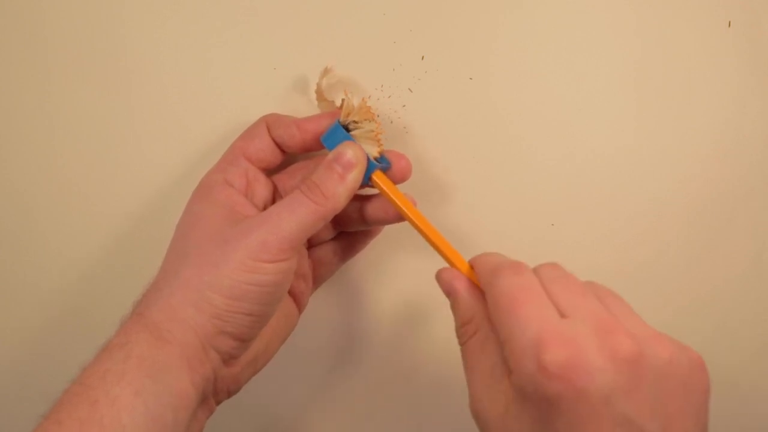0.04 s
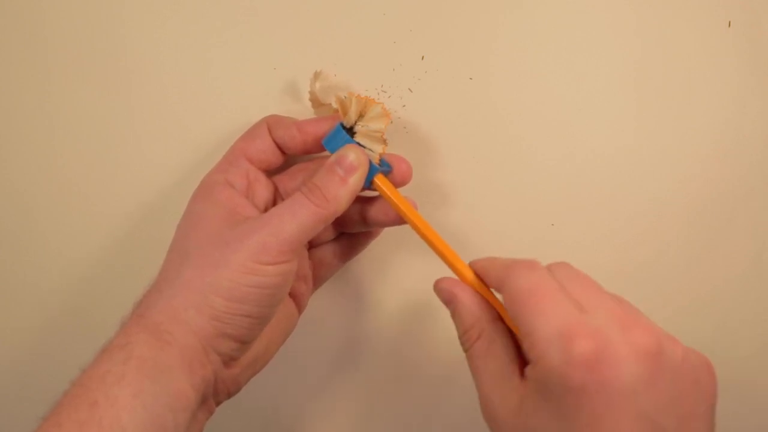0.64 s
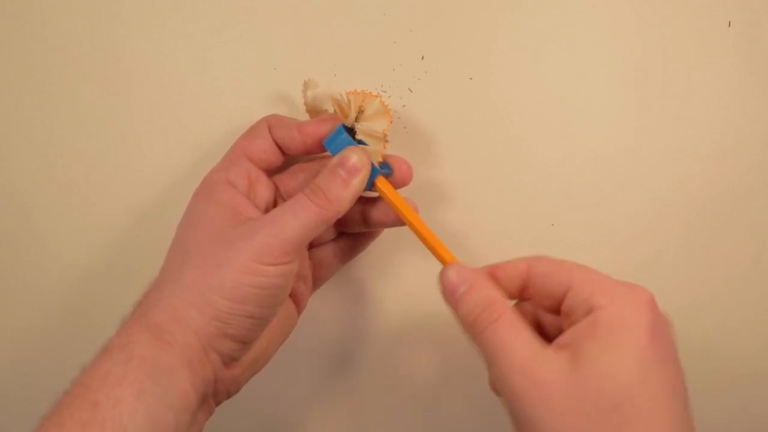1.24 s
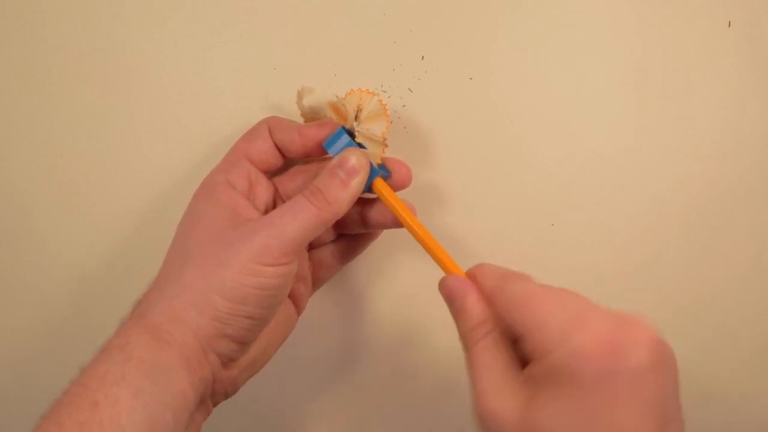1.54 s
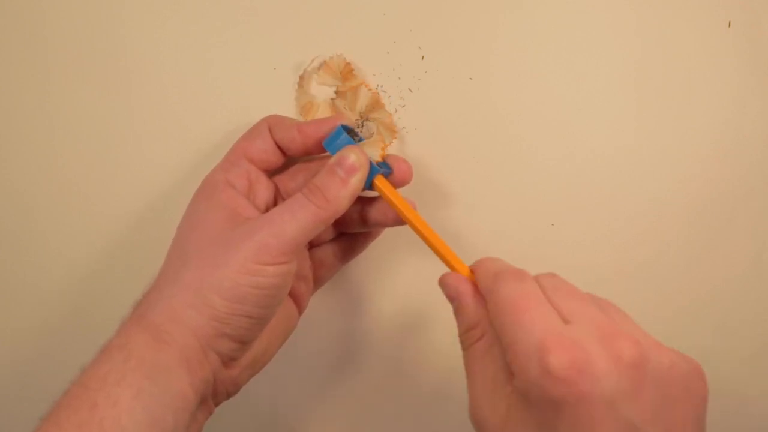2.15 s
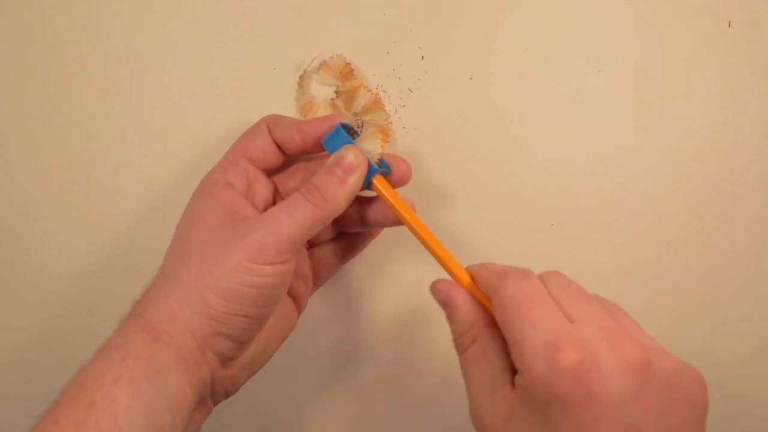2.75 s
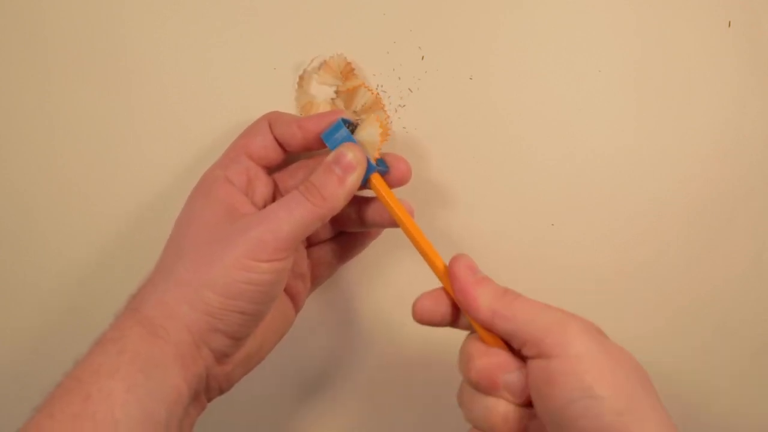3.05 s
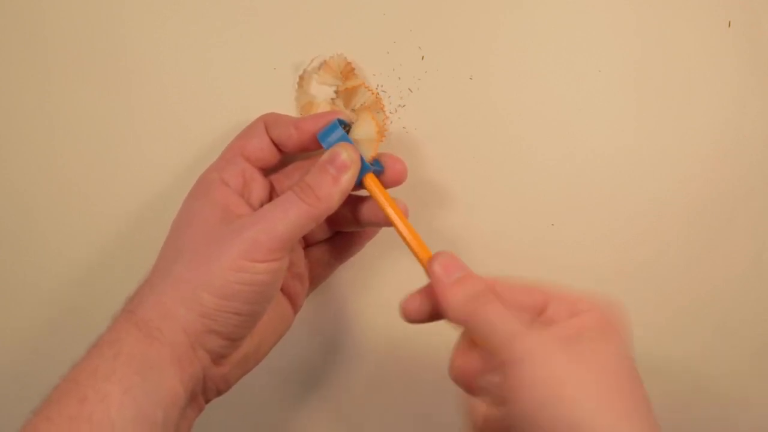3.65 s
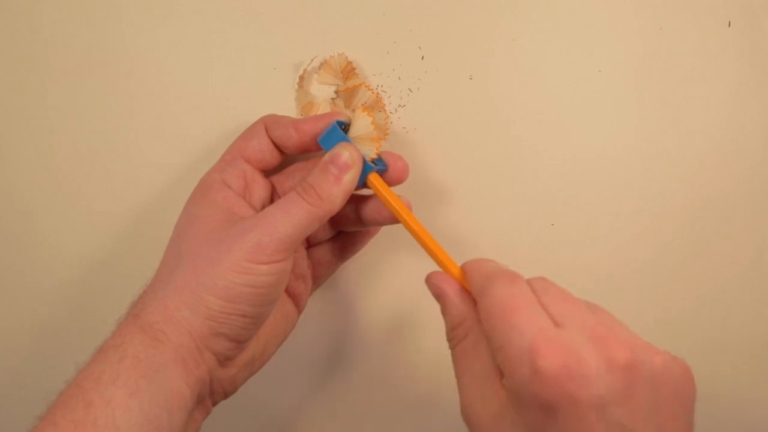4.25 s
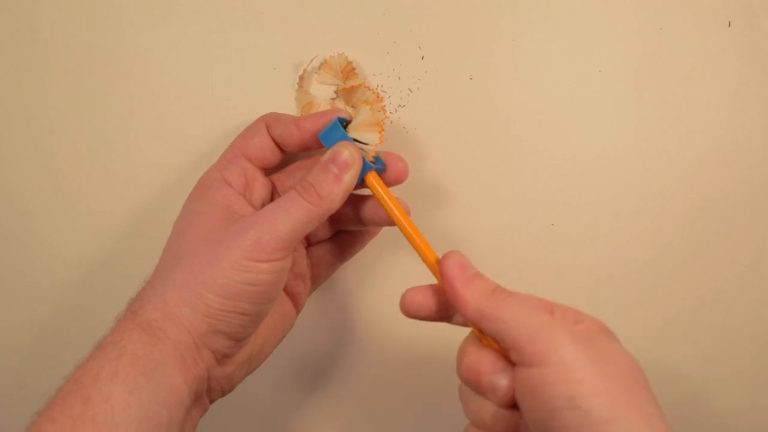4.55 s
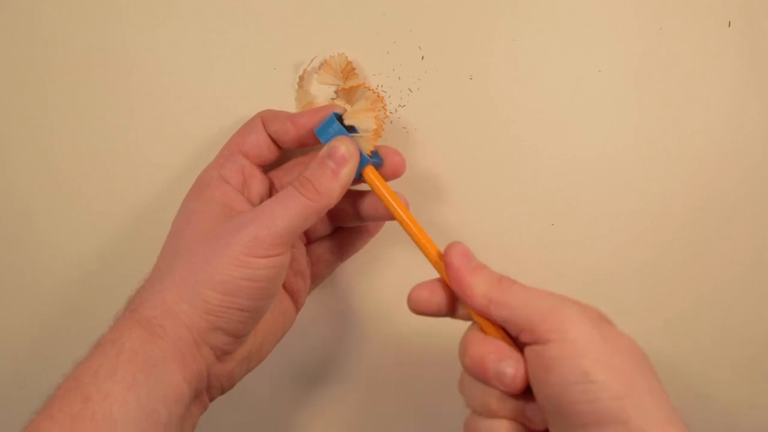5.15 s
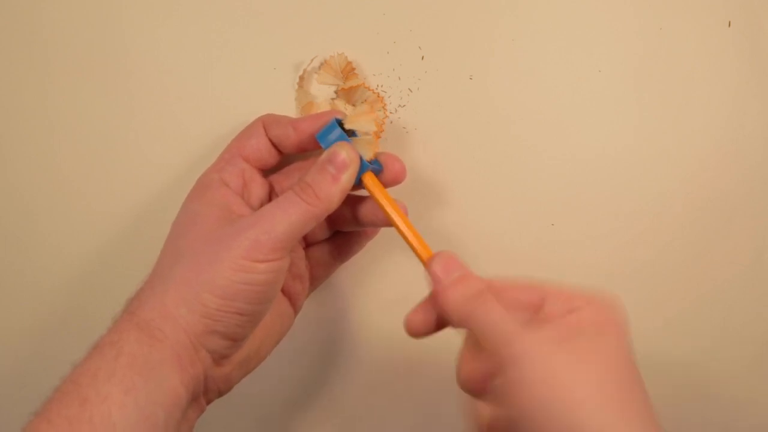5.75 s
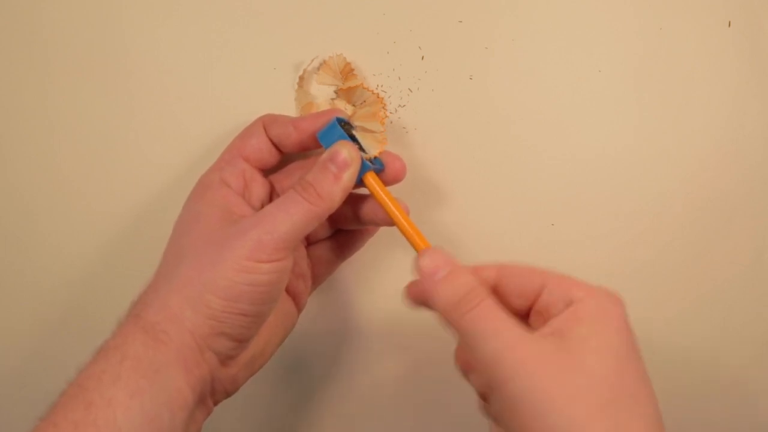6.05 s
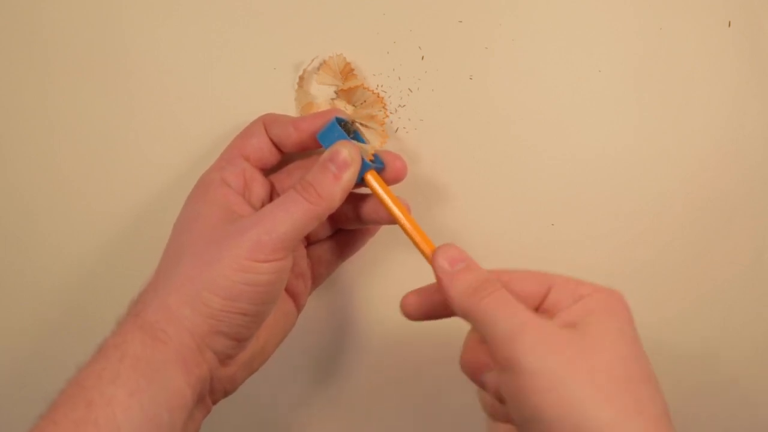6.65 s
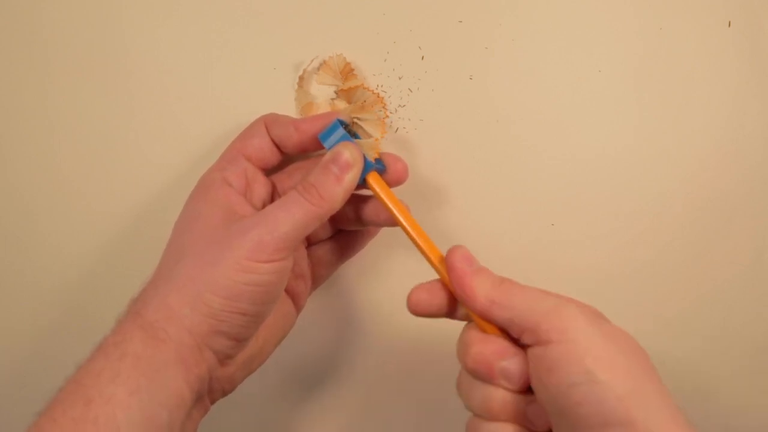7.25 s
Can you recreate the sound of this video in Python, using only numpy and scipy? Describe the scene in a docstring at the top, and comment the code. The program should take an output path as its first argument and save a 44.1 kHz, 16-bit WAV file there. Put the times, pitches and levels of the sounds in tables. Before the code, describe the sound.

A wooden pencil is turned in a small plastic sharpener, giving eleven short, grainy rasps, about one every two thirds of a second. Sharp snaps of cracking shavings mix with the strokes, each carrying a soft low rumble from the hands. Between twists, fingers rub faintly and the pencil ticks in its hole. The microphone is close, just above a table in a quiet room with a faint hum.

```python
"""Eleven short, grainy rasps with sharp snaps: a wooden pencil twisted in a small plastic sharpener.
The blade tears wood fibres, the curling shaving cracks, and the drag shakes sharpener and hands.
Between twists the fingers rub to a new grip and the pencil ticks loosely in its hole.
It all sits close to one microphone, just above a table, in a quiet room with faint air and hum."""
import sys
import numpy as np
from scipy import signal
from scipy.fft import rfft, irfft
from scipy.io import wavfile
from scipy.ndimage import uniform_filter1d

SR = 44100
rng = np.random.default_rng(int(sys.argv[2]) if len(sys.argv) > 2 else 0)


def dump(signal):
    """Clip the signal to [-1, 1] and save it as 16-bit WAV at the path in sys.argv[1]."""
    limited = np.clip(np.atleast_2d(signal).T, -1, 1)
    pcm = np.round(limited * 32767).astype(np.int16)
    wavfile.write(sys.argv[1], SR, pcm)


N = 331174
TIME = np.arange(N) / SR

# one row a twist: start/s, length/s, swell/dB, then levels before trim:
# rasp/dB, rumble/dB, body ring/dB, shell ring/dB (all at full pressure), regrip rub/dB
TWISTS = [ (0.255, 0.076, 5.4, -33.5, -59.5, -59.5, -57.5, -62.5),
          (0.945, .090, 5.6, -33, -56, -62.5, -55, -67.5),
          (1.659, 0.087, 3.8, -33, -57.5, -60.5, -58, -64.5),
          (2.344, 0.087, 3.6, -35.5, -56, -61, -58.5, -74.5),
          (3.018, 0.086, 2.3, -33.5, -53, -77, -55.5, -57.5),
          (3.697, 0.088, 10.7, -33.5, -55.5, -60, -56, -79), (4.419, 0.13, 10.6, -36, -58, -54, -59, -62),
          (5.12, 0.09, 13, -33, -52.5, -48.5, -52, -74), (5.805, 0.079, 13, -32.5, -54, -53.5, -55, -69.5),
          (6.459, 0.078, 9.4, -31, -52.5, -47.5, -54.5, -72),
          (7.192, 0.084, 5.5, -33, -53, -57, -52.5, -68)]


def blade(rasp_trim_db, snap_trim_db, judder_db):
    """Fibres tear by the thousand, clumping as the blade judders; the shaving cracks and splits."""
    # loud cracks of the shaving: t/s, relative level/dB, tilt/(dB per octave)
    snaps = [(0.275, -27.5, -2), (0.29, -30.5, -4), (0.317, -29.5, -2), (.9937, -34, -14),
             (1.005, -26, -11), (1.6642, -28, 0), (1.6856, -22, -3), (1.723, -19, -7), (1.7353, -19.5, 0.5),
             (2.3524, -16, -3), (2.3889, -9.5, -0.5), (3.023, -19.5, 0), (3.0639, -17.5, 8),
             (3.0815, -20, 15), (3.7452, -23.5, -3), (3.7539, -23.5, 4), (3.7752, -26, 2),
             (4.4436, -28.5, -1), (5.1494, -28, -5), (5.2315, -35, -1.5), (5.8581, -5.5, 1.5),
             (6.504, -12.5, -1.5), (6.531, -18, 0.5), (7.2044, -16.5, 1.5), (7.2254, -18.5, -1),
             (7.2452, -20, 3), (7.2528, -18.5, 4), (7.2695, -16.5, 2)]
    # the loose shaving crinkles as it settles: t/s, relative level/dB
    crinkles = [(0.438, -44), (1.83, -38.5), (1.892, -47), (2.511, -49), (2.532, -53), (2.564, -48),
                (2.586, -40), (3.236, -40)]
    # strips of wood split off with a pitched rip: t/s, half-length/s, level/dB, f/Hz
    splits = [(0.26, 0.0021, -44, 3470), (.987, 0.0016, -37, 8600), (1.006, .003, -35, 4800),
              (1.019, 0.0038, -39.5, 4580), (1.724, 0.00072, -40, 3870), (3.078, 0.0024, -35, 4500),
              (3.773, .0027, -39.5, 4240), (4.524, 0.014, -47.5, 3880), (5.19, 0.0045, -44, 4520)]
    # tone of tearing wood: f/Hz, relative level/dB
    rasp_eq = [(150, -16.5), (450, -13), (800, -9), (1200, -11.5), (1750, -6), (2450, -14.5), (3400, -0.5),
               (4900, -4), (6100, -7), (7500, 2), (10300, -2.5), (12700, 4), (14000, -13), (16000, -0.5)]
    # tone of a cracking shaving: f/Hz, relative level/dB
    crack_eq = [(300, -31.5), (1100, -41), (1800, -30), (2600, -8.5), (3700, -7.5), (5300, -8.5),
                (6200, -6), (7300, 0), (9200, 1), (10600, 0.5), (12800, 0.5), (15200, -6), (17000, -11.5)]
    # resonances of blade and plastic shell: f/Hz, width/Hz, lift/dB
    shell_modes = [(2190, 67, 13), (3966, 150, 9.5), (4590, 100, 10), (5150, 220, 6.5), (7500, 95, -8),
                   (7660, 200, -1.5), (8130, 340, 5), (9040, 160, 2), (9480, 290, 3), (11170, 200, -2),
                   (12100, 220, -9)]
    _, _, _, bites_db, *_ = np.transpose(TWISTS)
    # the blade sticks 5 ms before each snap, ducking the rasp by a third
    sticking = np.clip(swells([(s - .005, .003, -9.5) for s, *_ in snaps]), 0, 1)
    bite = (1 - sticking) * twisting(bites_db, swell_share=1, attack_s=.011, release_s=.015)
    tearing = wood_grain(grains(per_s=16000, spread_db=3), wander_db=1.5, rate_hz=31)
    judder = rms_one(from_db(judder_db * drift(170)))
    rasp = colour(tearing * judder * bite * from_db(rasp_trim_db), rasp_eq, shell_modes)
    crinkle = swells([(s, .0012, db) for s, db in crinkles]) * grains(per_s=2500, spread_db=6.5)
    snapping = bursts([*snaps, *splinters(bite, per_twist=4)], length_s=.0007, pivot_hz=7000)
    cracks = colour(from_db(snap_trim_db) * snapping + crinkle, crack_eq, shell_modes)
    fibres = rng.standard_normal(N)
    rips = sum(swells([(s, half_s, db)]) * ring(fibres, hz, .35 * hz, skirt=2)
               for s, half_s, db, hz in splits)
    return rasp + cracks + rips


def splinters(bite, per_twist):
    """Crack events: the edge catches, then splinters break at random, louder the harder it bites."""
    events = []
    for (start, length, *_), chances in zip(TWISTS, rng.random((len(TWISTS), per_twist, 2))):
        catch = (start + .001, 5.5)  # t/s, level over the bite/dB
        chips = [(start + when * length, 1.5 + 3 * size) for when, size in chances]
        events += [catch, *chips]
    return [(s, db + 20 * np.log10(bite[round(s * SR)] + 1e-9), 0) for s, db in events]


def wood_grain(x, wander_db, rate_hz):
    """As the pencil turns, harder and softer wood shifts the weight between registers."""
    crossovers_hz = np.geomspace(1800, 12000, 5)
    below = [signal.sosfiltfilt(signal.butter(2, hz, fs=SR, output="sos"), x) for hz in crossovers_hz]
    bands = np.diff([0 * x, *below, x], axis=0)
    return rms_one(sum(band * from_db(wander_db * drift(rate_hz)) for band in bands))


def twisting(levels_db, swell_share, attack_s, release_s, lead_s=0):
    """Each twist swells with the hand's pressure, holds and lets go; attack and release span 20 dB."""
    pressing_share = .61  # of the twist, until full pressure
    gain = np.zeros(N)
    for (start, length, swell_db, *_), db in zip(TWISTS, levels_db):
        near = slice(*np.searchsorted(TIME, [start - .2, start + .5]))
        t = TIME[near] - start
        slack = np.clip(1 - t / (pressing_share * length), 0, 1)
        fades = np.maximum(-t - lead_s, 0) / attack_s + np.maximum(t - length, 0) / release_s
        gain[near] += from_db(db - swell_share * swell_db * slack - 20 * fades)
    return gain


def drag(rumble_trim_db, body_trim_db, shell_trim_db):
    """The uneven pull of the cut shakes the hands and keeps the sharpener's modes ringing."""
    # tone of the shaking: f/Hz, relative level/dB
    rumble_eq = [(25, -5.5), (50, -9.5), (85, -5), (135, -4.5), (170, -15.5), (220, -10.5), (330, -25.5),
                 (500, -17), (900, -34.5), (2500, -66.5)]
    # resonances of hands and table: f/Hz, width/Hz, lift/dB
    hand_modes = [(71, 12, 13.5), (128.5, 19, 9.5)]
    # low modes of the sharpener in the hand: f/Hz, width/Hz, relative level/dB
    body_modes = [(255.6, 11, -1), (420, 22, -15), (486, 9.3, -15)]
    *_, rumbles_db, bodies_db, shells_db, _ = np.transpose(TWISTS)
    pull = rng.standard_normal(N)
    rumble = evened(colour(rng.standard_normal(N), rumble_eq, hand_modes))
    rumble *= twisting(rumbles_db + rumble_trim_db, swell_share=.38,
                       attack_s=.045, release_s=.08, lead_s=.004)
    body = sum(from_db(db) * evened(ring(pull, hz, width, skirt=8)) for hz, width, db in body_modes)
    body *= twisting(bodies_db + body_trim_db, swell_share=2.2, attack_s=.053, release_s=.098)
    shell = ring(pull, hz=2113, width_hz=150, skirt=4)
    shell *= twisting(shells_db + shell_trim_db, swell_share=1.1, attack_s=.013, release_s=.04)
    return rumble + body + shell


def fingers(tick_trim_db, scrape_db, rattle_db):
    """After each twist the skin slides to a new grip and the pencil scrapes and ticks in its hole."""
    # the pencil knocks in its hole: t/s, relative level/dB, tilt/(dB per octave)
    ticks = [(.6818, -47, -14.5), (.711, -56, -9), (.8027, -54.5, -13), (2.1935, -56, -17),
             (2.2621, -54, -12.5), (5.8002, -47, -12), (5.9654, -41.5, -9), (6.0385, -33.5, 5),
             (6.0474, -36, 5), (6.0533, -41, -23), (6.085, -40.5, -9), (6.0887, -29.5, 5.5),
             (6.0968, -42, -4), (6.1389, -34.5, -3), (6.1737, -47, -5), (6.2332, -53, -2.5)]
    # longer scrapes of the blunt shaft: t/s, half-length/s, relative level/dB
    slides = [(1.815, .03, -55), (1.9, 0.033, -66.5), (2.55, .068, -62.5), (6.055, 0.0067, -47),
              (6.17, 0.054, -61.5)]
    # dull knocks of fingers and pencil: t/s, relative level/dB, tilt/(dB per octave)
    taps = [(1.273, -56, 0), (1.6428, -40.5, 0.5), (2.378, -36.5, -0.5), (2.42, -44.5, -9),
            (3.0051, -46, -4), (5.423, -54, 3.5), (5.787, -47.5, -4), (5.821, -47.5, -10),
            (7.178, -52.5, -6), (7.403, -55, -15)]
    # tone of rubbing skin: f/Hz, relative level/dB
    grip_eq = [(60, 8), (130, 1), (350, -10), (600, -16), (1200, -22.5), (2400, -18.5), (3600, -27.5),
               (5000, -37), (12000, -26)]
    # tone of a padded tap: f/Hz, relative level/dB
    pad_eq = [(200, -16), (700, -7), (1400, 0), (2200, 2.5), (3200, -2), (5000, -4), (12000, -25)]
    # tone of wood knocking on plastic: f/Hz, relative level/dB
    knock_eq = [(300, -11), (1000, -27), (1800, -14.5), (2600, -3), (3500, 0), (4400, -1.5), (5200, -2.5),
                (7500, -7.5), (11000, -13.5), (16000, -20.5)]
    # the pencil's own resonances: f/Hz, width/Hz, lift/dB
    pencil_modes = [(2130, 160, 10.5), (3400, 760, 9.5), (3800, 450, 4.5), (4400, 280, 1.5)]
    regrip = swells([(start + length + .19, .14, rub_db) for start, length, *_, rub_db in TWISTS])
    friction = regrip * rng.standard_normal(N) * from_db(1.4 * drift(8.7))
    rub = colour(friction, grip_eq, resonances=[(360, 230, 7.5)])
    loose = swells([(start + length + .43, .2, 0) for start, length, *_ in TWISTS])
    contact = loose * from_db(scrape_db + 2.2 * drift(14)) + swells(slides)
    scrapes = contact * grains(per_s=3300, spread_db=12)
    rattle = loose * from_db(rattle_db) * grains(per_s=21, spread_db=1.5)
    knocks = from_db(tick_trim_db) * bursts(ticks, length_s=.0013, pivot_hz=3800)
    tapping = bursts(taps, length_s=.004, pivot_hz=2000)
    handling = colour(tapping + rattle, pad_eq, resonances=[(2180, 270, 7)])
    return rub + handling + colour(knocks + scrapes, knock_eq, pencil_modes)


def table_top(x):
    """The direct sound plus what the table throws back within milliseconds, slightly scattered."""
    # early reflections: delay/s, level/dB
    echoes = [(.00162, -8.5), (.00255, -11.5)]
    scattered = signal.lfilter([.5, -.4, 1], [1, -.4, .5], x)  # all-pass smear
    out = x.copy()
    for delay_s, db in echoes:
        lag = round(delay_s * SR)
        out[lag:] += from_db(db) * scattered[:-lag]
    return out


def room(x, wet_db, t60_s, treble_t60_s, treble_hz, treble_db):
    """A diffuse tail whose top dies sooner; nearby things answer first."""
    t = np.arange(SR // 2) / SR
    noise = rng.standard_normal(len(t))
    low = signal.sosfiltfilt(signal.butter(2, treble_hz, fs=SR, output="sos"), noise)
    tail = low * from_db(-60 * t / t60_s) + (noise - low) * from_db(treble_db - 60 * t / treble_t60_s)
    tail *= (t > .003) * (1 + .74 * np.exp(-t / .028))  # pre-delay and early lift
    return from_db(wet_db) * signal.oaconvolve(x, tail / np.linalg.norm(tail))[:N]


def background(air_db, hum_db, hum_hz):
    """Faint room air and a wavering mains hum."""
    # room tone: f/Hz, relative level/dB
    air_eq = [(12, -25.5), (20, 7), (70, -1.5), (103, -9), (232, -11), (306, -13), (491, -19.5), (614, -21),
              (811, -21), (1010, -22.5), (1670, -25), (1920, -25.5), (3640, -25.5), (4950, -29),
              (15500, -30.5)]
    air = colour(rng.standard_normal(N), air_eq, resonances=[(1690, 40, 6), (3650, 1100, 1.4)])
    hum = np.sqrt(2) * np.sin(2 * np.pi * hum_hz * TIME + .2 * drift(1))
    return from_db(air_db) * air + from_db(hum_db + .73 * drift(2)) * hum


def from_db(db):
    """Decibels to gain."""
    return 10 ** (np.asarray(db) / 20)


def rms_one(x):
    """Scales to rms 1."""
    return x / np.sqrt(np.mean(x ** 2) + 1e-20)


def evened(x):
    """A leveller: holds the running rms near 1."""
    return x / np.sqrt(uniform_filter1d(x ** 2, 2400) + 1e-3)


def drift(rate_hz):
    """Smooth random modulation, rms 1."""
    hop = 20
    pole = np.exp(-2 * np.pi * rate_hz * hop / SR)
    noise = rng.standard_normal(N // hop + 2002)
    slow = signal.lfilter([1], [1, -2 * pole, pole * pole], noise)[2000:]
    return np.interp(np.arange(N) / hop, np.arange(len(slow)), rms_one(slow))


def swells(rows):
    """Bell-shaped envelopes from rows of t/s, half-length/s, level/dB."""
    gain = np.zeros(N)
    for s, half_s, db in rows:
        near = slice(*np.searchsorted(TIME, [s - 4 * half_s, s + 4 * half_s]))
        gain[near] += from_db(db) * np.exp(-((TIME[near] - s) / half_s) ** 2)
    return gain


def grains(per_s, spread_db):
    """Random clicks of uneven size, rms 1."""
    sizes = from_db(spread_db * np.minimum(rng.exponential(1, N), 4)) * rng.choice([-1, 1], N)
    return rms_one(sizes * (rng.random(N) < per_s / SR))


def bursts(events, length_s, pivot_hz, size=512):
    """Brief runs of micro-impacts, each flattened in spectrum, then tilted around the pivot."""
    out, t = np.zeros(N + size), np.arange(size) / SR
    octaves = np.clip(np.log2((np.fft.rfftfreq(size, 1 / SR) + 1) / pivot_hz), -1, 1)
    fade = np.exp(-(t / length_s) ** 2)
    for (s, db, tilt), impacts in zip(events, rng.standard_normal((len(events), size))):
        flat = np.exp(1j * np.angle(rfft(impacts * fade)))
        burst = fade * irfft(flat * from_db(tilt * octaves))
        burst *= np.sqrt(SR / 1000) / np.linalg.norm(burst)  # the energy of 1 ms at rms 1
        at = round(s * SR)
        out[at:at + size] += from_db(db) * burst
    return out[:N]


def colour(x, eq, resonances, size=8192):
    """Unit-energy EQ: a smooth curve plus resonances (f/Hz, width/Hz, lift/dB)."""
    hz = np.maximum(np.fft.rfftfreq(size, 1 / SR), 1)
    knots, levels = np.transpose(eq)
    db = np.interp(np.log(hz), np.log(knots), levels)
    for centre, width, lift in resonances:
        db += lift / (1 + (2 * (hz - centre) / width) ** 2)
    # minimum phase, so nothing rings ahead of a click
    cepstrum = irfft(np.log(from_db(db)))
    cepstrum[1:size // 2] *= 2
    cepstrum[size // 2 + 1:] = 0
    response = irfft(np.exp(rfft(cepstrum)))
    return signal.oaconvolve(x, response / np.linalg.norm(response))[:N]


def ring(x, hz, width_hz, skirt):
    """One resonance at rms 1, its flanks steepened by a second that is skirt times as wide."""
    for width in (width_hz, skirt * width_hz):
        pole = np.exp(-np.pi * width / SR)
        feedback = [1, -2 * pole * np.cos(2 * np.pi * hz / SR), pole * pole]
        x = rms_one(signal.lfilter([1, 0, -1], feedback, x))
    return x


def scene():
    """Blade and fingers reflect off table and room; drag and background lie dry beneath, all in mono."""
    cutting = blade(rasp_trim_db=-3, snap_trim_db=-1, judder_db=3.5)
    handling = fingers(tick_trim_db=2.5, scrape_db=-82, rattle_db=-86)
    close = table_top(cutting + handling)
    reverb = room(close, wet_db=-12.5, t60_s=.38, treble_t60_s=.15, treble_hz=9000, treble_db=.5)
    shaking = drag(rumble_trim_db=5, body_trim_db=1.2, shell_trim_db=.5)
    mono = close + reverb + shaking + background(air_db=-59.84, hum_db=-64.5, hum_hz=52)
    return np.array([mono, mono])


def record(dry):
    """The microphone drops the deepest bass; each channel adds hiss, clips and loses its very top."""
    low_cut_hz, high_cut_hz, hiss_db = 29, 15750, -74.4
    low_cut = signal.butter(2, low_cut_hz, "high", fs=SR, output="sos")
    high_cut = signal.ellip(10, .2, 80, high_cut_hz, fs=SR, output="sos")
    hiss = from_db(hiss_db) * rng.standard_normal((2, N))
    clipped = np.clip(signal.sosfilt(low_cut, dry) + hiss, -1, 1)
    return signal.sosfilt(high_cut, clipped)


dry = scene()
out = record(dry)
dump(out)
```